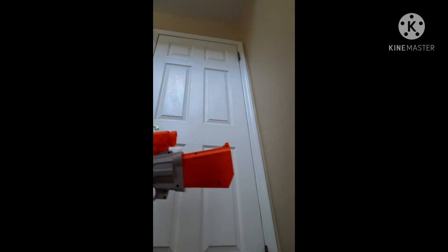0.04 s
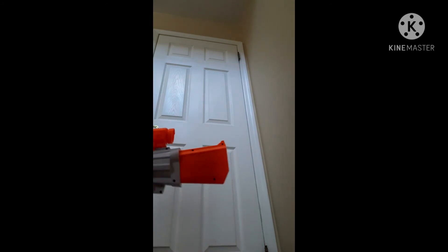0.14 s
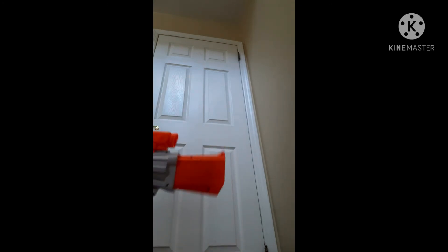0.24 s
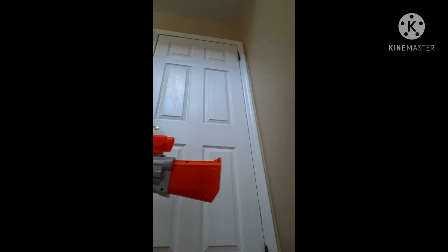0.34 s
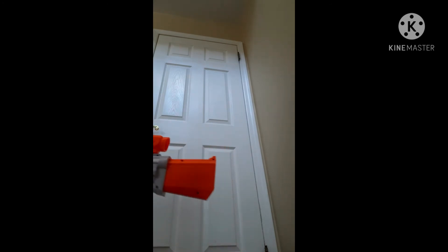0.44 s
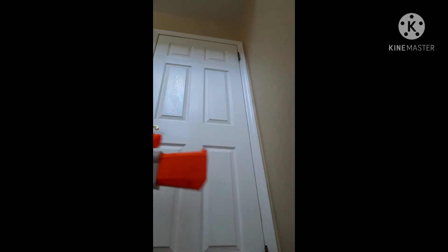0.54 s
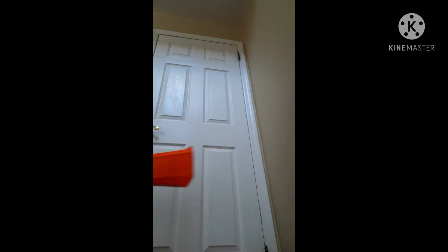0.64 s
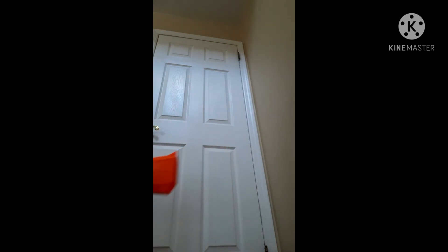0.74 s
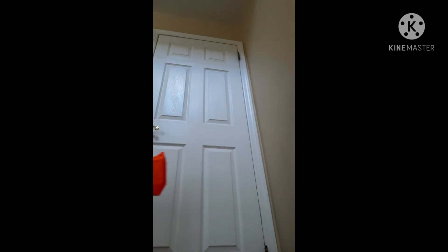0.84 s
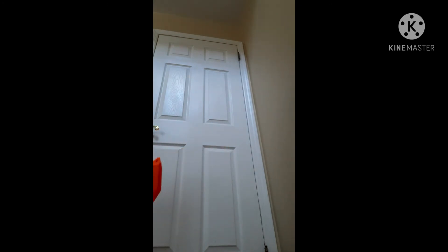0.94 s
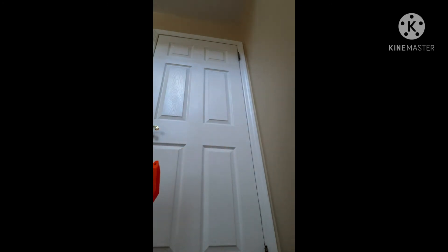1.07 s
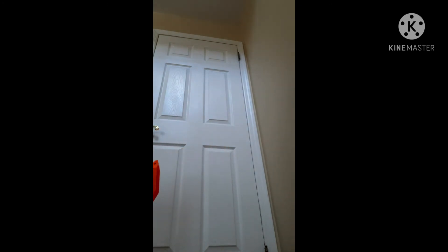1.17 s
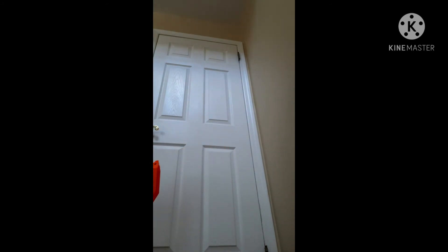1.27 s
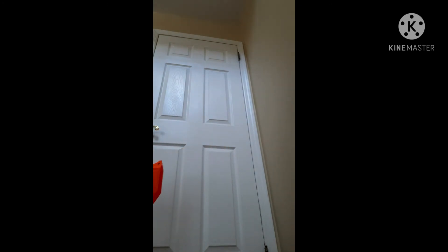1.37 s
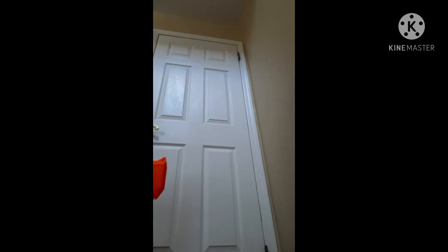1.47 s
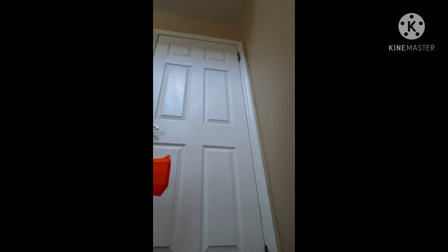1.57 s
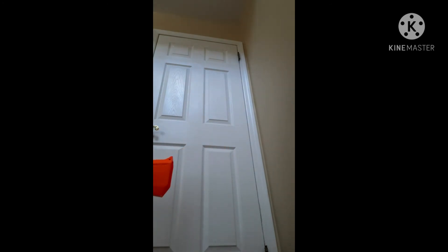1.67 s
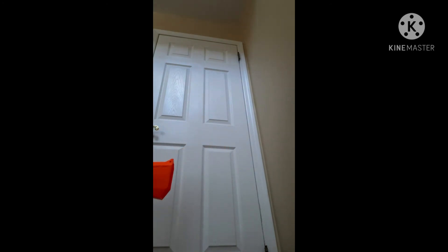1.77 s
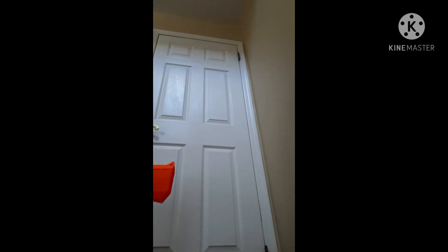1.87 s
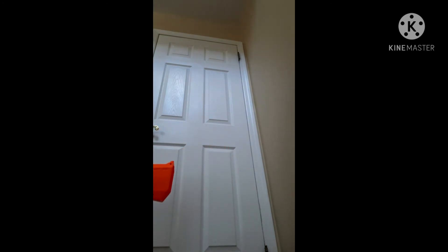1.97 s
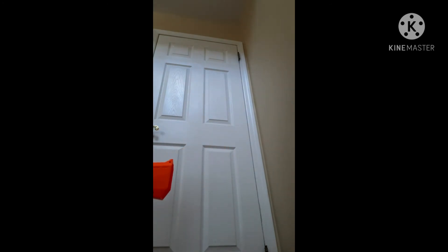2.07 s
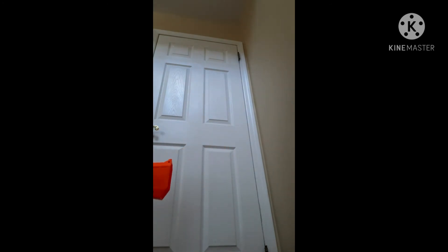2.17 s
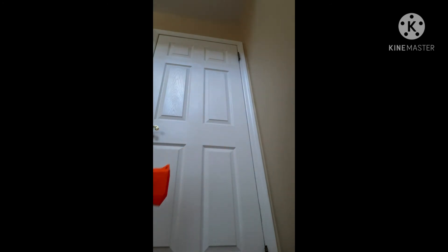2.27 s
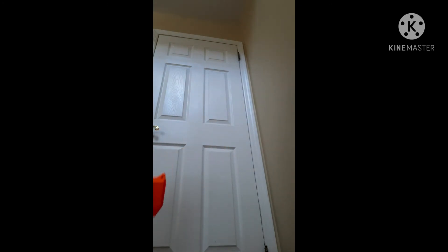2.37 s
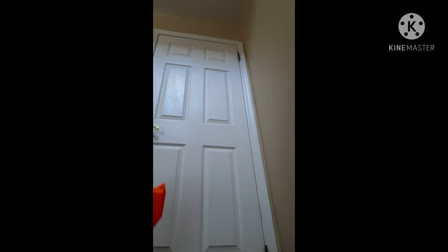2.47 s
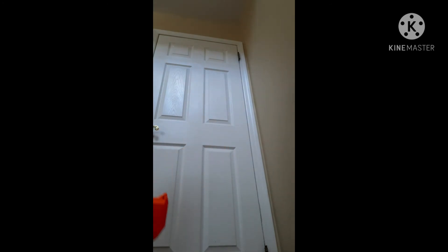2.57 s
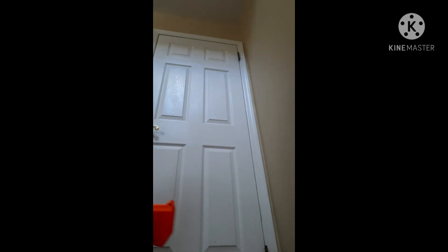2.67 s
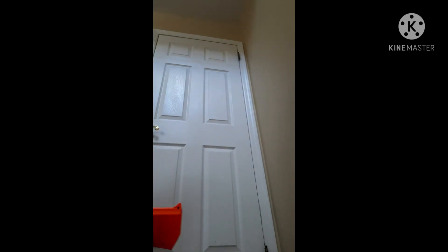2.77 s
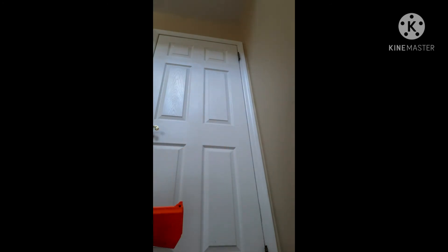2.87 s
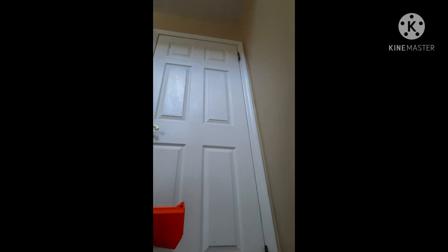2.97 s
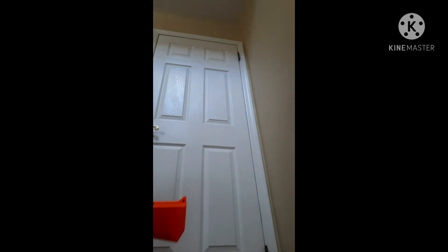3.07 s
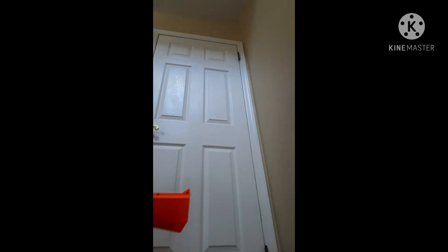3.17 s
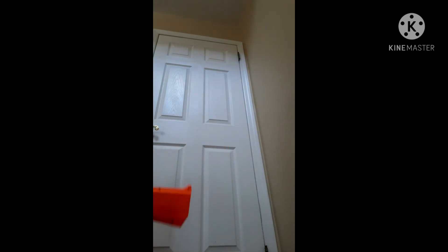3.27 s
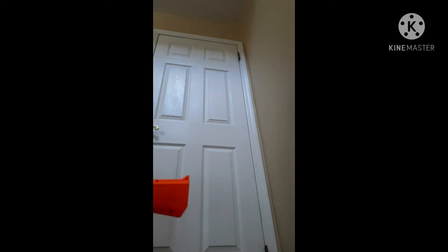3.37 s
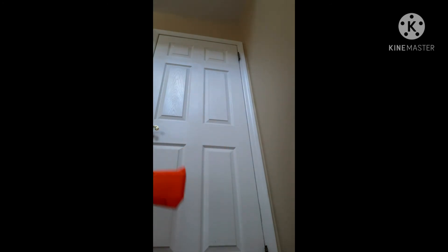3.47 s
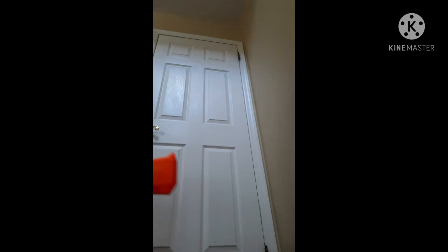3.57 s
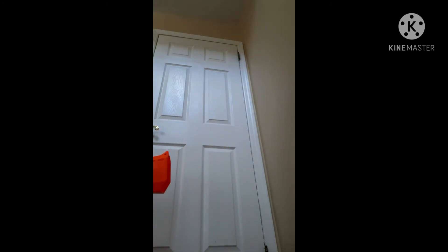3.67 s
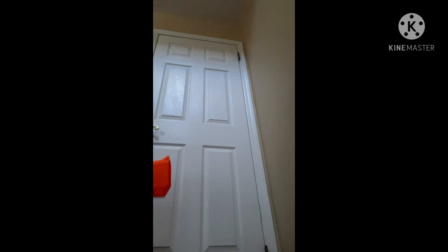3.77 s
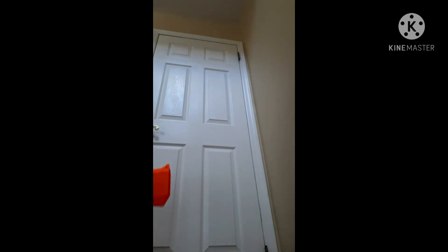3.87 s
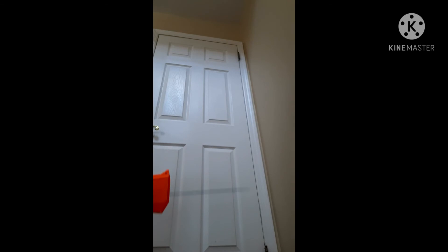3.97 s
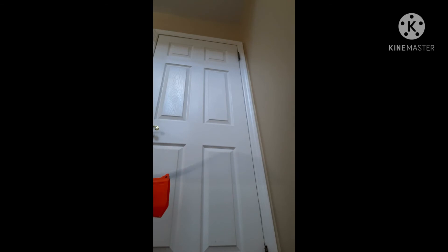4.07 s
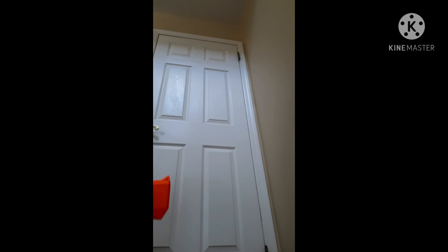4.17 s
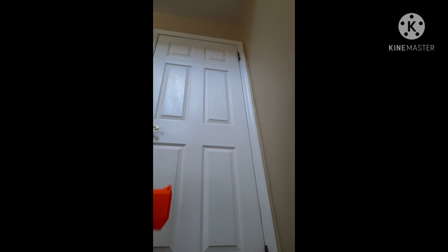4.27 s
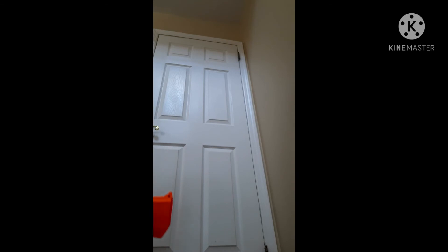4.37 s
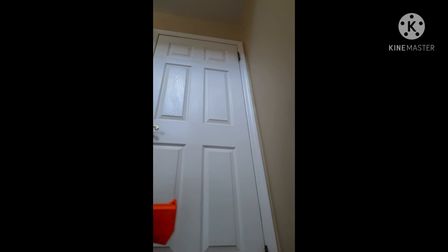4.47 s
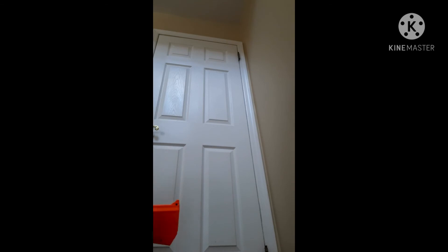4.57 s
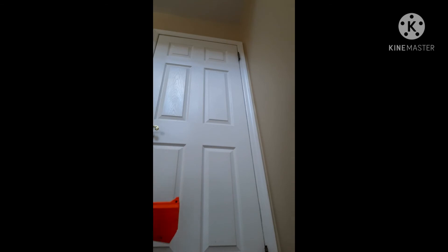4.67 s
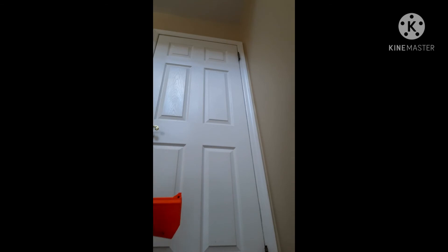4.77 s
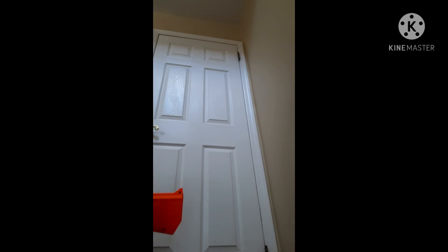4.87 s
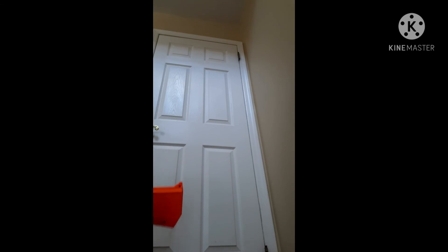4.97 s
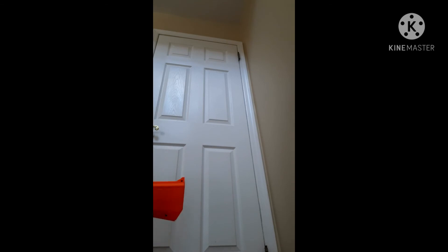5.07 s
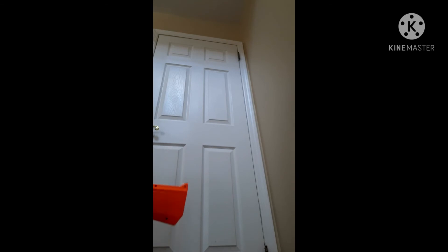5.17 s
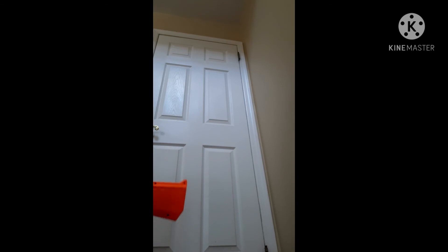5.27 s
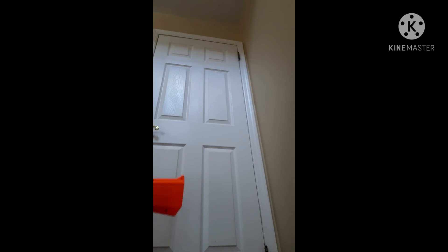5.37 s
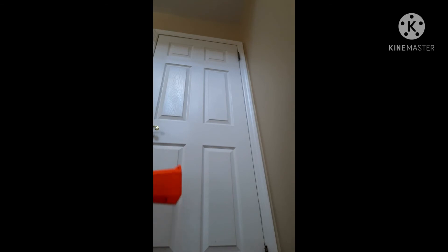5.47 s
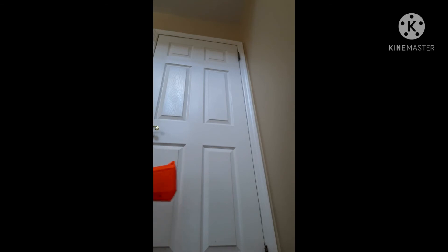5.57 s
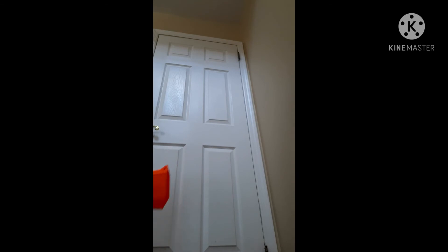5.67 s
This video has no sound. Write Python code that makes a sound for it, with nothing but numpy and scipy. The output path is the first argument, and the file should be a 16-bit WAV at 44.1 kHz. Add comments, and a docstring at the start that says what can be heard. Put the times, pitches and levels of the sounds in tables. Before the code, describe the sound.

Dry plastic clicks and a stuttering slide end in a cracking latch snap. After light fumbling, a spring plunger slams and a dart instantly slaps a hollow door, which booms briefly. More rattling, a second snap, a second shot with a deep pop, then a quieter final cocking. Close stereo microphone, short indoor echo, faint rumble and hiss.

```python
"""Plastic spring dart pistol

A toy dart pistol is cocked three times and fired twice in a small room, close to the microphone.
The slide scrapes and ticks back until the latch snaps; each shot slams the plunger home, and some
40 ms later the dart thumps a panel door and drops. Loose parts click, the grip scuffs and knocks.
Blows, clicks and scrapes are coloured noise; the door and the hollow shell also ring as decaying sines.
Low rumble and faint hiss lie underneath."""
import sys
import numpy as np
from scipy import signal
from scipy.fft import rfft, irfft
from scipy.io import wavfile
from scipy.ndimage import uniform_filter1d

SR = 44100
rng = np.random.default_rng(int(sys.argv[2]) if len(sys.argv) > 2 else 0)


def dump_mix(stems):
    """Bounce the given channels to the path in sys.argv[1] as a 16-bit WAV at rate SR."""
    frames = np.atleast_2d(stems).T  # one column per channel
    limited = np.clip(frames, -1, 1)  # hard clip at full scale
    pcm = np.round(limited * 32767).astype(np.int16)
    wavfile.write(sys.argv[1], SR, pcm)


N = 252516  # length [samples]
HZ = np.fft.rfftfreq(4096, 1 / SR)  # frequency grid of all colours [Hz]

# room background, colour before the rumble/hiss split: (frequency [Hz], density [dB])
AIR_TONE = [(15, -55), (25, -16), (43, -5), (96, 2), (140, -10.5), (178, -3), (246, -21.5), (445, -21.5),
            (509, -25.5), (598, -29), (1410, -37.5), (1710, -32.5), (15500, -36.5)]
# the background sinks for a moment after the second shot: (time [s], gain [dB])
BACKGROUND_LULL = [(4.25, 0.5), (4.68, -11), (4.95, -14.5), (5.17, -1.5)]
# stereo spread over frequency: (frequency [Hz], side over mid [ratio])
STEREO_WIDTH = [(60, 0.074), (170, 0.18), (330, 0.089), (600, .8), (1500, 0.48), (15000, 1)]
# decay of the room tail: (frequency [Hz], t60 [s])
ROOM_DECAY = [(100, .4), (260, 0.46), (700, 0.34), (1800, 0.31), (4800, 0.28), (7000, .28), (13000, 0.29)]
# near surfaces: (delay before a small random shift [s], level [dB])
NEAR_ECHOES = [(.003, -11), (0.013, -14), (0.016, -15.5), (0.0216, -21.5)]
# colour difference of the two microphone ports: (frequency [Hz], left over right [dB])
PORT_TILT = [(40, -0.5), (130, 2.5), (300, -2.5), (600, -7), (1100, -2.5), (2000, 0), (4500, 4.5),
             (9000, 3.5), (15000, 2.5)]

# the dart meets the door:
# (time [s], first slap level [dB], its t60 [s], second slap level [dB], boom level [dB])
DOOR_HITS = [(2.069, -3, 0.044, -6, -11.5), (4.0395, -4.5, .012, -7, -14)]
# door panel and room modes: (frequency [Hz], level within the boom [dB], t60 [s])
DOOR_MODES = [(60, -19, .45), (82, -18, .4), (106, -12, .36), (146, -11, .25), (163, -3, .25),
              (179, 0, .31), (231, -7, .26), (295, -4, .21), (316, -6, .21), (361, -10, .27),
              (398, -13, .27), (436, -15, .26), (468, -11, .23), (501, -11, .24), (565, -13, .2),
              (607, -15, .2), (772, -16, .22)]
# a deep pop right after the second dart lands: (time [s], level [dB], pitch [Hz], length [s])
DEEP_THUMP = (4.0405, -4, 97, .0105)

# the hand shifts on the grip with a soft scuff:
# (time [s], length [s], level [dB], pitch [Hz], a third of the -6 dB bandwidth [Hz])
GRIP_SCUFFS = [(0.539, 0.13, -57, 3890, 602), (0.658, 0.22, -68.5, 726, 150),
               (3.644, 0.061, -53, 3000, 3400), (3.732, 0.053, -55, 654, 300),
               (5.491, .07, -53.5, 710, 696), (5.686, 0.066, -53.5, 4000, 4470)]
# dull knocks of the slide during the first stroke, of the falling dart and of the grip: (time [s], level [dB],
# pitch [Hz])
DULL_KNOCKS = [(0.107, -38.5, 450.2), (0.202, -34.5, 599), (0.247, -38.5, 556.5), (0.47, -41, 498),
               (0.777, -51.5, 679), (2.382, -38.5, 377.2), (2.396, -37.5, 688), (2.575, -39.5, 297.4),
               (2.587, -38, 248.3), (2.777, -56, 310), (3.731, -40.5, 801), (4.367, -38, 349),
               (4.384, -45.5, 688), (4.77, -61.5, 353), (5.492, -39.5, 589.3)]
# the slide rubs along its rails: (start [s], end [s], level at start [dB], level at end [dB])
SLIDE_STROKES = [(0, 0.112, -53.5, -56), (0.102, 0.275, -50.5, -43), (3.085, 3.24, -51, -49),
                 (3.71, 3.97, -62.5, -82), (5.005, 5.17, -57, -61), (5.29, 5.44, -58.5, -56.5)]
# clear plastic clicks of slide, trigger, drum and dart:
# (time [s], level before CLICK_TRIM_DB [dB], low body lift [dB], rise [s])
PLASTIC_CLICKS = [ (0.019, -28.5, -7, .0003), (0.037, -23, -5.5, .0004), (0.077, -27.5, 4, 0.00046),
                  (0.103, -23, 1, .004), (0.129, -29, -10, .0004), (0.149, -21, -2, .0008),
                  (0.1589, -23, -10.5, .0026), (0.178, -28, 12, 0.0011), (0.201, -21, 8.5, 0.00037),
                  (0.215, -29.5, 11, .0004), (0.244, -30, 12, 0.00044), (0.42, -29.5, -0.5, 0.00085),
                  (0.435, -21.5, -1, 0.0022), (0.482, -32, 1.5, .0004), (0.506, -25.5, -19, 0.00038),
                  (0.785, -47.5, 7, 0.00306), (0.872, -32, 0.5, 0.00043), (0.971, -42, -22.5, .0004),
                  (1.028, -39.5, -5, .0005), (1.039, -40, -9, .0005), (1.136, -35, -4, .0006),
                  (1.895, -56.5, 8, 0.00037), (2.007, -46.5, 9, .0004), (2.026, -27.5, 8.5, .0004),
                  (2.324, -36, 10, 0.0039), (2.39, -36.5, 8, 0.0013), (2.3954, -22, 6.5, 0.00035),
                  (2.503, -31, 4.5, 0.0032), (2.583, -34.5, 10, 0.0022), (2.922, -42, -8, 0.00033),
                  (3.042, -39, 15.5, 0.00061), (3.077, -32.5, 13.5, .0003), (3.132, -33.5, -2, 0.00076),
                  (3.176, -35.5, 10, .0004), (3.22, -29.5, 13.5, .0004), (3.379, -26.5, 5.5, .001),
                  (3.436, -32, -5, 0.00031), (3.614, -42, -5, 0.00034), (3.73, -32, 5, .0003),
                  (3.808, -34.5, -9.5, .001), (3.822, -39.5, -4.5, .0004), (3.879, -33, -2.5, .0004),
                  (3.978, -34.5, -7, .0004), (3.991, -27.5, 1.5, 0.00037), (4.2628, -31.5, 8, 0.0012),
                  (4.301, -41.5, 5, .0004), (4.403, -53, 10.5, 0.00038), (4.597, -58.5, -2.5, 0.00044),
                  (4.77, -61.5, 10, .002), (4.848, -64.5, 3.5, .0004), (4.982, -40, 5, .0004),
                  (5.175, -32, 3, .0004), (5.269, -29.5, -8, 0.0011), (5.318, -30, -6.5, .002),
                  (5.36, -35, -16, .0004), (5.38, -33.5, -5, .0004), (5.414, -26, -13.5, 0.00026),
                  (5.49, -32, 7, 0.00037)]
# resonances of the hollow shell: (frequency [Hz], width [Hz], lift [dB])
SHELL_MODES = [(1130, 60, 6.5), (1230, 55, 6), (1360, 60, 6), (1490, 60, 5.5), (2350, 90, 3), (2640, 50, 4),
               (3920, 80, 4), (4110, 60, 4), (4870, 70, 2), (6050, 200, 2), (6700, 250, 2)]
# the latch catches the plunger and the slide rebounds:
# (time [s], level [dB], t60 [s], brightness [dB per octave], left over right [dB])
LATCH_SNAPS = [(0.2792, 0, 0.022, 0, 0), (0.3015, -14.5, 0.015, 1.5, 3.5), (3.2446, -6.5, 0.034, 1, 0.5),
               (3.2574, -33, 0.019, 2.5, 2.5), (5.1894, -19, 0.036, -1, -0.5), (5.2036, -24.5, 0.017, 0, 4)]
# the plunger strikes, then the spring rebounds:
# (time [s], level [dB], t60 [s], brightness [dB per octave], left over right [dB])
SHOT_BLOWS = [(2.0302, 1.5, 0.035, 0, 4), (2.034, -3.5, 0.027, -0.5, 5), (2.0425, -7.5, .075, 0.5, 2.5),
              (3.9956, -3.5, 0.048, 0, 4), (4.0085, -7, 0.055, 2.5, 2.5), (4.017, -11, 0.078, -1.5, 0.5)]

# colour of clicks and rubbing: (frequency [Hz], density [dB])
CLICK_TONE = [(40, -18), (200, -21), (450, -3.5), (900, -0.5), (1300, 2.5), (2000, 3.5), (3300, 0.5),
              (5000, 0), (6900, -0.5), (8000, -16), (12000, -20), (15500, -24)]
# colour of the latch: (frequency [Hz], density [dB])
LATCH_TONE = [(30, -19), (150, -14.5), (400, -12.5), (800, -6.5), (1200, 2.5), (1900, 1.5), (3000, 2.5),
              (5000, -0.5), (7000, 2), (8500, -10), (12000, -12), (15500, -17.5)]
# colour of the plunger blow: (frequency [Hz], density [dB])
SHOT_TONE = [(30, -10), (130, 3.5), (300, 1), (600, 0), (1000, -3), (2000, 3), (3300, 1), (5000, 0),
             (7200, 1), (7800, -13), (12000, -10), (15500, -15)]
# colour of the dart slapping the door: (frequency [Hz], density [dB])
SLAP_TONE = [(40, -15), (110, -3), (170, 1.5), (320, 6.5), (550, 1.5), (1000, -2), (2000, -2), (3300, 0),
             (5000, -7.5), (7000, -8.5), (8000, -18.5), (15000, -22.5)]

RUMBLE_DB, HISS_DB = -70, -69
BAND_EDGE_HZ = 15600
# harder contacts are sharper: top edge of a click at the usual table level, and its growth [dB per dB]
USUAL_CLICK_DB, TOP_EDGE_DB, EDGE_PER_DB = -32, 0.5, 0.19
CLICK_TRIM_DB = -2.5  # common to all clicks
PISTOL_PAN_DB = 2  # left over right
# a moving slide sticks and lets go about this often; the harder it rubs, the louder each catch
CATCH_EVERY_S, CATCH_JITTER_S, CATCH_SPREAD_DB = .019, .004, 2.5
# tick (before the click trim) and knock relative to the rubbing level, and the low body of the tick
CATCH_TICK_DB, CATCH_KNOCK_DB, CATCH_BODY_DB = 11.5, 0.5, 6
CATCH_LOW_HZ, CATCH_HIGH_HZ = 328, 520


def amp(db):
    """Decibels to gain."""
    return 10 ** (np.asarray(db) / 20)


def unit(x):
    """Scales to an rms of one."""
    return x / np.sqrt(np.mean(x ** 2) + 1e-20)


def read(points, hz):
    """Reads a table on a logarithmic frequency axis."""
    f, value = np.transpose(points)
    return np.interp(np.log(hz + 1), np.log(f + 1), value)


def add(mix, s, sound):
    """Adds a sound to the mix at time s."""
    part = mix[:, max(round(s * SR), 0):][:, :sound.shape[-1]]
    part += sound[..., :part.shape[1]]


def sides(db):
    """Left and right gains for a level difference."""
    return amp([[db / 2], [-db / 2]])


def pair(x):
    """Two unrelated signals become left and right, alike in the bass and apart in the treble."""
    width = read(STEREO_WIDTH, np.fft.rfftfreq(x.shape[1], 1 / SR))
    mid, side = rfft(x)
    left_right = np.array([mid + width * side, mid - width * side])
    return irfft(left_right / np.sqrt(1 + width ** 2), x.shape[1])


def mode_phase(hz):
    """Random start phase of a mode; left and right differ more where the stereo spread is wider."""
    return 2 * np.pi * rng.random() + read(STEREO_WIDTH, hz) * rng.standard_normal((2, 1))


def colour(x, db):
    """Causal filter of unit energy; the phase follows from the log gain (minimum phase)."""
    log_gain = np.log(amp(db))
    circle = np.concatenate([log_gain, log_gain[-2:0:-1]])
    taps = np.fft.ifft(np.exp(np.conj(signal.hilbert(circle)))).real
    taps = taps / np.linalg.norm(taps)
    return signal.fftconvolve(x, taps[None], axes=1)[:, :x.shape[1]]


def patches(x, depth_db, size=5, count=4):
    """The point of contact wanders, so each moment stirs other parts of the spectrum."""
    z = signal.stft(x, SR, nperseg=256)[2]
    field = uniform_filter1d(rng.standard_normal(z.shape[1:]), size, axis=0)  # smooth over frequency
    field = uniform_filter1d(field, count, axis=1)  # smooth over time
    gain = unit(amp(depth_db * unit(field)))
    return signal.istft(z * gain, SR, nperseg=256)[1][:, :N]


def shell(tone):
    """A colour with the resonances of the hollow plastic shell on top."""
    lift = sum(db / (1 + (2 * (HZ - hz) / width) ** 2) for hz, width, db in SHELL_MODES)
    return read(tone, HZ) + lift


def burst(t60, db, grain_db=0, rise=0.00059, size=8192, count=30):
    """A blow on a part with countless short modes: a quick start and a fall that chatters as parts rattle."""
    t, rise = np.arange(size) / SR, max(rise, .0001)
    chatter = np.clip(unit(uniform_filter1d(rng.standard_normal(size), count)), -2, 2)
    fall = np.minimum(t / rise, 1) * amp(-60 * np.maximum(t - rise, 0) / max(t60, .002))
    noise = pair(rng.choice([-1., 1.], (2, size)))
    return colour(noise * fall * unit(amp(grain_db * chatter)), db)


def air(split_hz=400):
    """Low room rumble and faint microphone hiss, with one lull."""
    low = -10 * np.log10(1 + (HZ / split_hz) ** 4)
    high = 10 * np.log10(1.0001 - amp(low) ** 2)  # the power that the low band leaves over
    rumble = colour(pair(rng.standard_normal((2, N))), read(AIR_TONE, HZ) + low)
    hiss = colour(pair(rng.standard_normal((2, N))), read(AIR_TONE, HZ) + high)
    lull_db = np.interp(np.arange(N) / SR, *np.transpose(BACKGROUND_LULL))
    return (amp(RUMBLE_DB) * rumble + amp(HISS_DB) * hiss) * amp(lull_db)


def room(x, wet_db=-3, build=0.0019, gap=0.00085, size=32768):
    """Direct sound, a few near echoes and a short diffuse tail whose bass lasts longest."""
    t = np.arange(size) / SR
    hz, frame_s, z = signal.stft(pair(rng.standard_normal((2, size))), SR, nperseg=256)
    decay = amp(-60 * frame_s / read(ROOM_DECAY, hz)[:, None])
    tail = signal.istft(z * decay, SR, nperseg=256)[1][:, :size]
    tail = tail * (1 - np.exp(-np.maximum(t - gap, 0) / build))
    response = amp(wet_db) * tail / np.linalg.norm(tail[0])
    response[:, 0] += 1  # direct sound
    for delay, db in NEAR_ECHOES:
        at = np.round((delay + rng.uniform(-0.00028, 0.00015, 2)) * SR).astype(int)
        response[np.arange(2), at] += amp(db)
    return signal.fftconvolve(x, response, axes=1)[:, :N]


def scuffs():
    """Skin on plastic: a smooth swell of friction noise in one broad resonance."""
    out = np.zeros((2, N))
    for s, length, db, hz, width in GRIP_SCUFFS:
        swell = signal.windows.hann(round(length * SR))
        tone = -20 * np.log10(1 + ((HZ ** 2 - hz ** 2) / (3.0 * width * (HZ + 1))) ** 2)
        friction = pair(rng.standard_normal((2, len(swell)))) * swell
        add(out, s, amp(db) * colour(friction, np.maximum(tone, -60)))
    return out


def knock(db, hz, t60=0.026, rise=0.0037, puff_db=-6, puff_t60=0.012):
    """One soft contact: a short low ring inside a dull puff."""
    tone = -20 * np.log10(1 + (HZ / hz - hz / (HZ + 1)) ** 2)
    puff = amp(puff_db) * burst(puff_t60, np.maximum(tone, -60))
    t = np.arange(puff.shape[1]) / SR
    ring = amp(-60 * t / t60) * (1 - np.exp(-t / rise)) * np.sin(2 * np.pi * hz * t)
    return amp(db) * (2 * ring + puff)


def knocks():
    """The slide knocks as it is first pulled; the dart bounces on the floor; the hand bumps the grip."""
    out = np.zeros((2, N))
    for s, db, hz in DULL_KNOCKS:
        add(out, s, knock(db, hz))
    return out


def click(db, body_db, rise, t60=0.03, body_hz=800, edge_hz=7400, grain_db=2):
    """One light contact on the shell, with more or less low body; the harder it is, the sharper its edge."""
    low = 1 / (1 + (HZ / body_hz) ** 4)
    high = 1 - 1 / (1 + (HZ / edge_hz) ** 8)
    edge_db = TOP_EDGE_DB + EDGE_PER_DB * (db - USUAL_CLICK_DB)
    tone = shell(CLICK_TONE) + body_db * low + edge_db * high
    return amp(db + CLICK_TRIM_DB) * sides(PISTOL_PAN_DB) * burst(t60, tone, grain_db, rise)


def clicks():
    """Loose parts click as the pistol is worked."""
    out = np.zeros((2, N))
    for s, db, body_db, rise in PLASTIC_CLICKS:
        add(out, s, click(db, body_db, rise))
    return out


def slide(slips_per_s=450, spread_db=4, pan_db=2, slip_s=.0012, body_db=4):
    """Plastic on plastic: many tiny slips of uneven size and colour excite the shell."""
    t = np.arange(N) / SR
    level = np.zeros(N)
    for start, end, *dbs in SLIDE_STROKES:
        level += amp(np.interp(t, [start, end], dbs)) * (t >= start) * (t < end)
    slips = rng.random(N) < slips_per_s / SR
    slips = slips * amp(spread_db * np.minimum(rng.exponential(1, N), 3))
    envelope = signal.lfilter([1], [1, -np.exp(-1 / (slip_s * SR))], slips)  # each slip dies away
    grains = patches(envelope * pair(rng.standard_normal((2, N))), depth_db=5)
    tone = shell(CLICK_TONE) + body_db / (1 + (HZ / 900) ** 4)
    return sides(pan_db) * colour(unit(grains) * level, tone)


def judder(rise=0.00068, pan_db=-2, count=16):
    """The slide catches again and again along each stroke; returns its ticks and its dull knocks."""
    ticks, thuds = np.zeros((2, 2, N))
    for start, end, *dbs in SLIDE_STROKES:
        for k, (late, strength, place) in enumerate(rng.uniform(-1, 1, (count, 3))):
            s = start + (k + .5) * CATCH_EVERY_S + late * CATCH_JITTER_S
            db = np.interp(s, [start, end], dbs) + strength * CATCH_SPREAD_DB
            hz = np.interp(place, [-1, 1], [CATCH_LOW_HZ, CATCH_HIGH_HZ])
            moving = s < end  # catches beyond the stroke are silent
            add(ticks, s, moving * click(db + CATCH_TICK_DB, CATCH_BODY_DB, rise))
            add(thuds, s, moving * knock(db + CATCH_KNOCK_DB, hz))
    return ticks * sides(pan_db), thuds  # the pan brings the ticks back to the centre


def door(rise=0.0044, second_s=.0108, second_t60=0.056, grain_db=3):
    """The dart slaps the panel and buckles against it; the low modes swell and boom on."""
    slaps, boom, t = np.zeros((2, N)), np.zeros((2, N)), np.arange(SR) / SR
    tone = read(SLAP_TONE, HZ)
    for s, first_db, t60, second_db, boom_db in DOOR_HITS:
        add(slaps, s, amp(first_db) * burst(t60, tone, grain_db))
        add(slaps, s + second_s, amp(second_db) * burst(second_t60, tone, grain_db))
        for hz, db, ring_t60 in DOOR_MODES:
            envelope = amp(boom_db + db - 60 * t / ring_t60) * (1 - np.exp(-t / rise))
            add(boom, s, envelope * np.sin(2 * np.pi * hz * t + mode_phase(hz)))
    return slaps, boom * sides(-1.5)


def thump(push_s=0.00041):
    """A brief negative push of pressure as the second dart lands, then about one cycle of a low sine."""
    s, db, hz, length = DEEP_THUMP
    out, t = np.zeros((2, N)), np.arange(round(length * SR)) / SR
    add(out, s, amp(db) * np.sin(2 * np.pi * hz * t))
    add(out, DOOR_HITS[-1][0], -amp(db) * t / push_s * np.exp(1 - t / push_s))
    return out * sides(-2)


def hollow_ring(level_db=-37, t60=.33, rise=.015, count=4):
    """Each latch blow sets the lowest resonances of the hollow shell ringing on."""
    out, t = np.zeros((2, N)), np.arange(SR // 2) / SR
    envelope = amp(level_db - 60 * t / t60) * (1 - np.exp(-t / rise))
    for s, db, *_ in LATCH_SNAPS:
        for hz, _, _ in SHELL_MODES[:count]:
            add(out, s, amp(db) * envelope * np.sin(2 * np.pi * hz * t + mode_phase(hz)))
    return out


def snaps(rows, tone, grain_db):
    """Hard spring-driven blows inside the pistol."""
    out = np.zeros((2, N))
    octaves = np.log2(np.maximum(HZ, 500) / 3000)  # brightness tilts about 3 kHz
    for s, db, t60, bright, pan in rows:
        add(out, s, amp(db) * sides(pan) * burst(t60, shell(tone) + bright * octaves, grain_db))
    return out


def latches():
    """The latch catches the plunger: short bursts that fall almost smoothly."""
    return snaps(LATCH_SNAPS, LATCH_TONE, grain_db=0.5)


def shots():
    """The spring slams the plunger home: blows that chatter strongly as they fall."""
    return snaps(SHOT_BLOWS, SHOT_TONE, grain_db=5.0)


def scene():
    """The pistol is near, its dull knocks nearest and driest; the door is farther off."""
    slaps, boom = door()
    catch_ticks, catch_knocks = judder()
    ticks = patches(clicks() + catch_ticks, depth_db=2.5)
    background = air()
    dart_on_door = room(slaps, wet_db=-5.5) + boom + thump()
    dull_contacts = room(knocks() + catch_knocks, wet_db=-13)
    handling = room(ticks + slide() + scuffs(), wet_db=-7)
    blows = room(latches() + shots(), wet_db=-6) + hollow_ring()
    return background + dart_on_door + dull_contacts + handling + blows


def record(dry):
    """Each port has its own colour; peaks beyond full scale clip; then the band limit."""
    tilt_db = read(PORT_TILT, np.fft.rfftfreq(N, 1 / SR))
    heard = irfft(rfft(dry) * amp([tilt_db / 2, -tilt_db / 2]), N)
    low_pass = signal.firwin(255, BAND_EDGE_HZ, window=("kaiser", 8), fs=SR)
    return signal.oaconvolve(np.clip(heard, -1, 1), low_pass[None], "same")


dry = scene()
out = record(dry)
dump_mix(out)
```